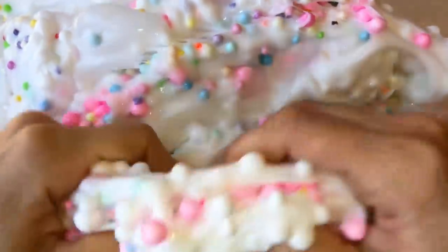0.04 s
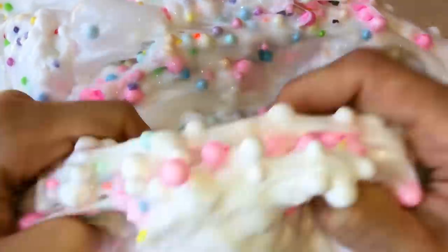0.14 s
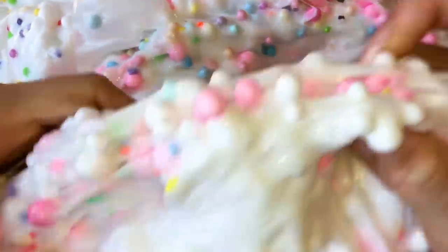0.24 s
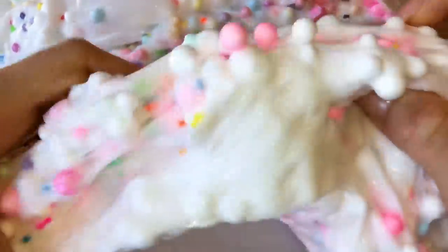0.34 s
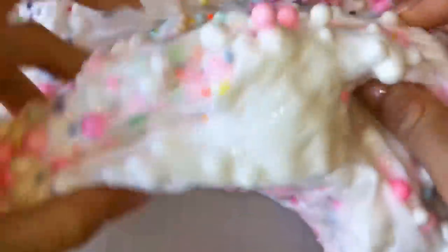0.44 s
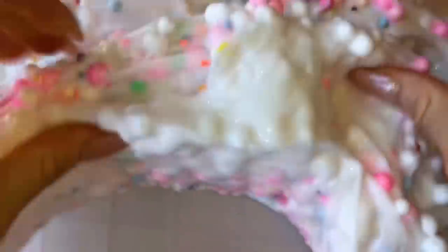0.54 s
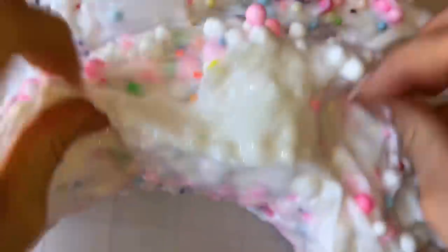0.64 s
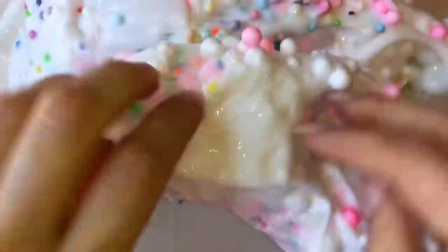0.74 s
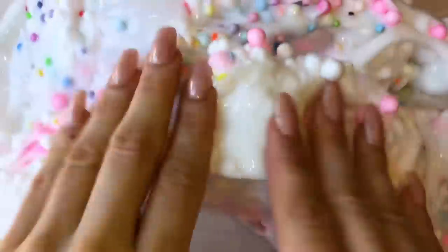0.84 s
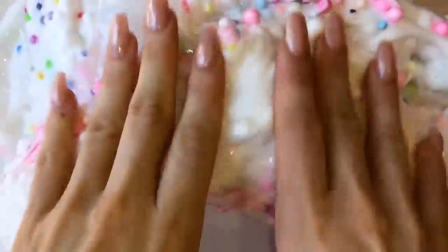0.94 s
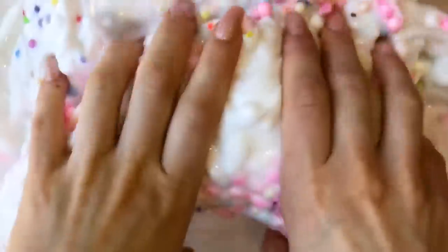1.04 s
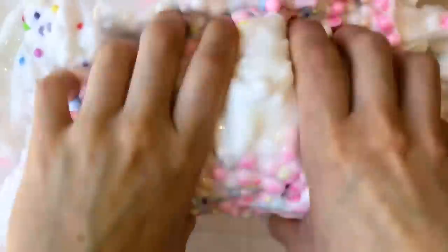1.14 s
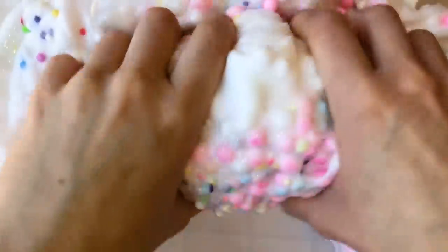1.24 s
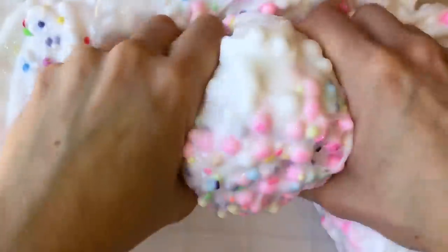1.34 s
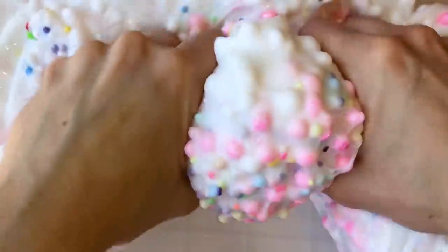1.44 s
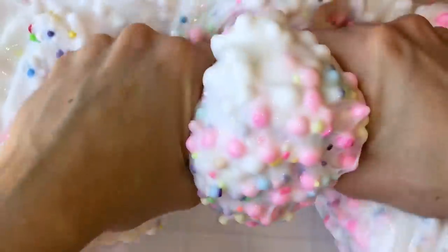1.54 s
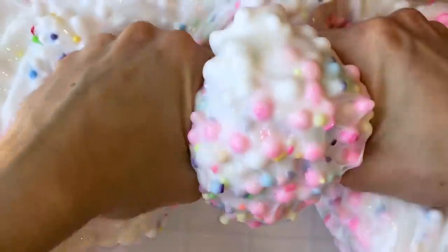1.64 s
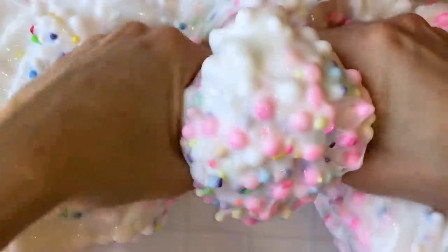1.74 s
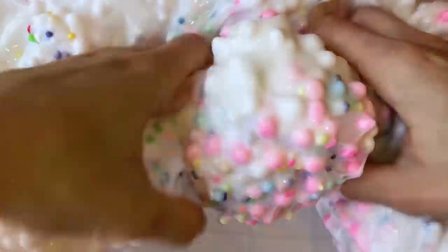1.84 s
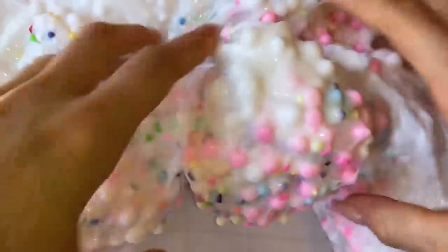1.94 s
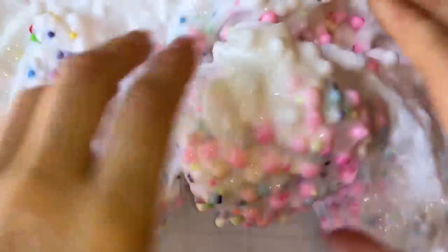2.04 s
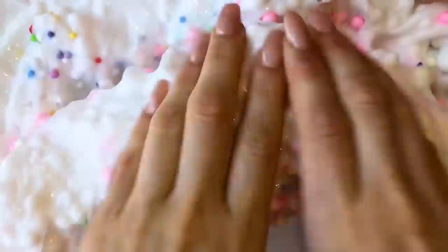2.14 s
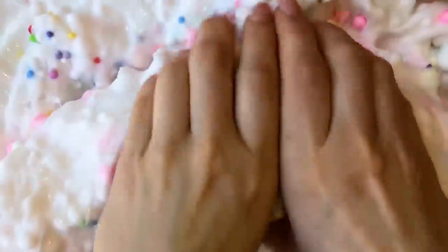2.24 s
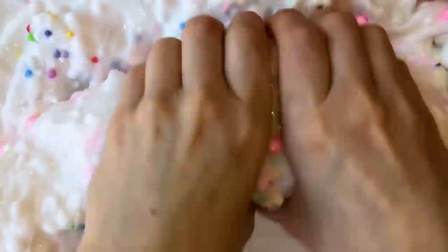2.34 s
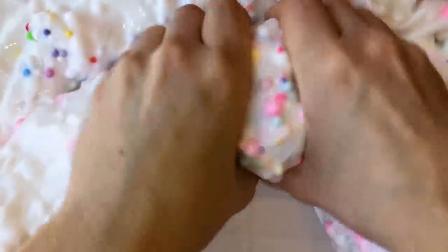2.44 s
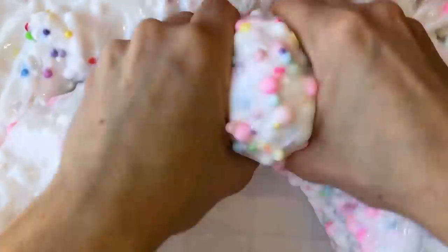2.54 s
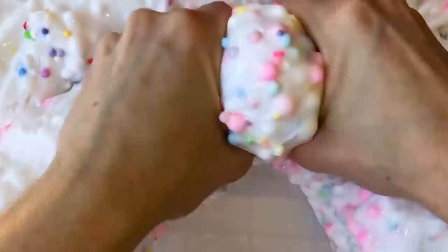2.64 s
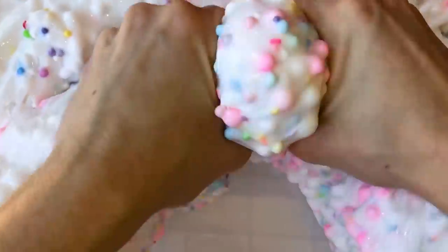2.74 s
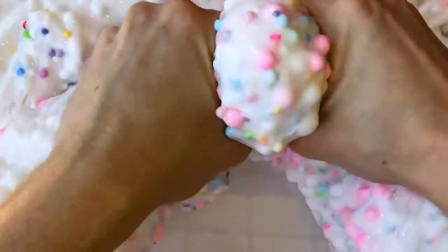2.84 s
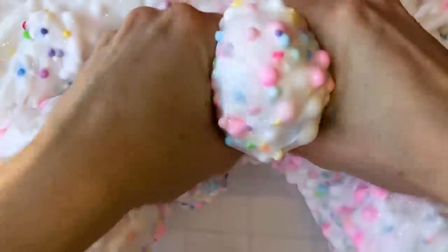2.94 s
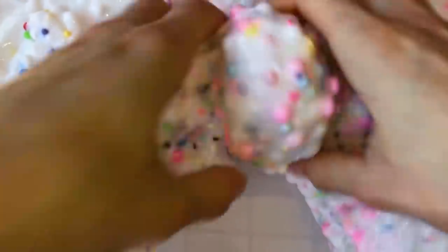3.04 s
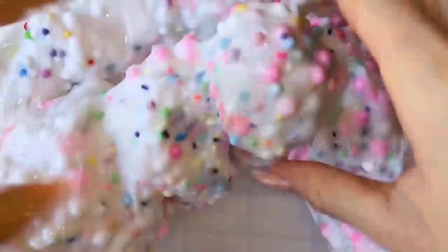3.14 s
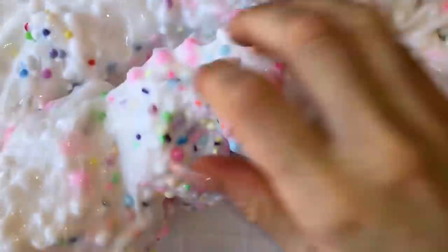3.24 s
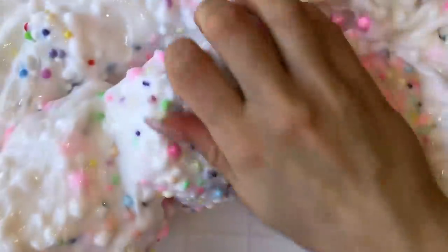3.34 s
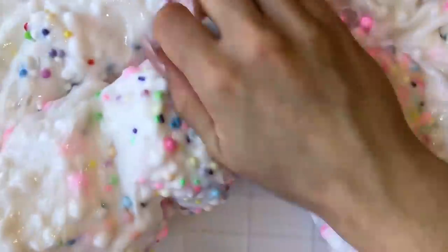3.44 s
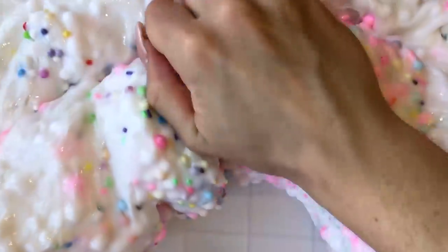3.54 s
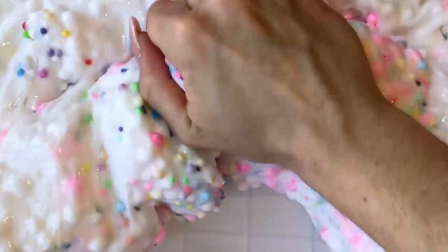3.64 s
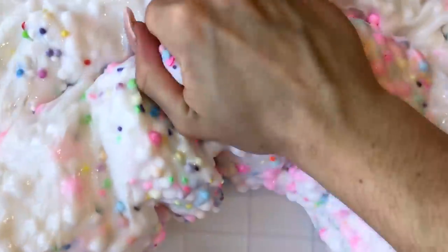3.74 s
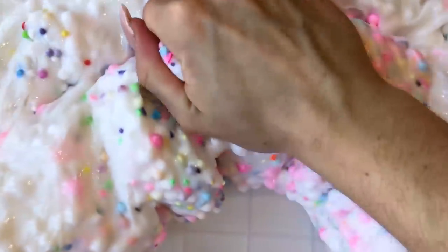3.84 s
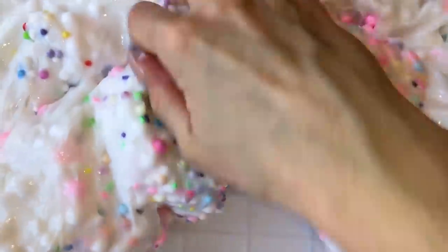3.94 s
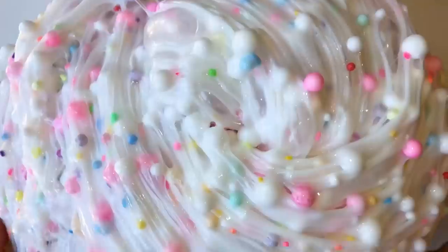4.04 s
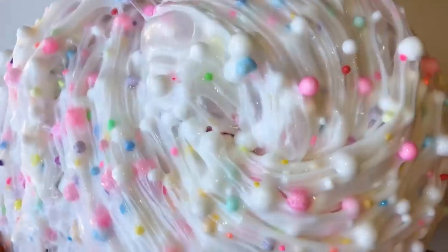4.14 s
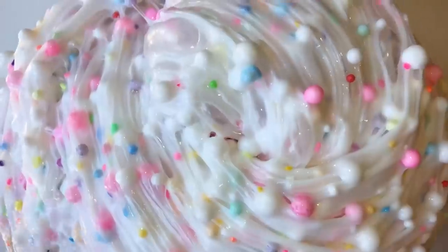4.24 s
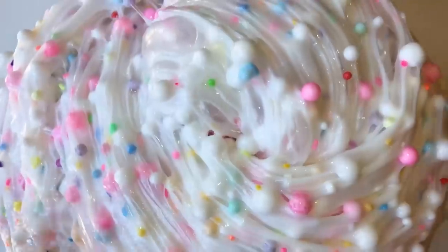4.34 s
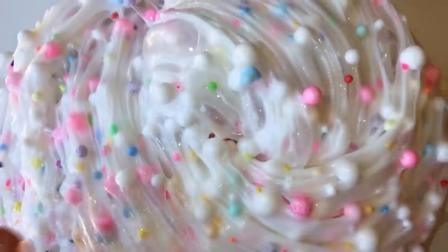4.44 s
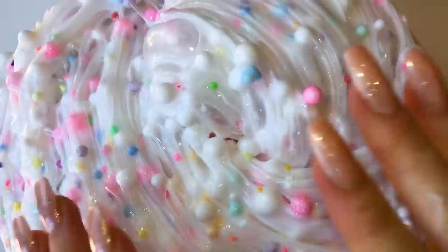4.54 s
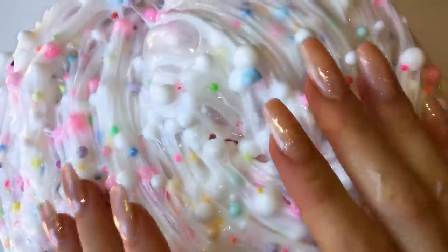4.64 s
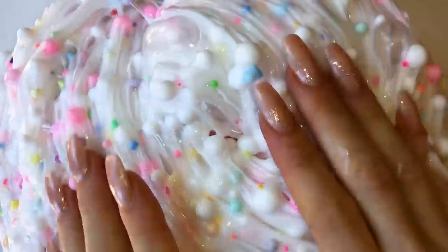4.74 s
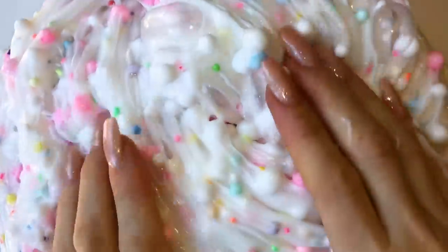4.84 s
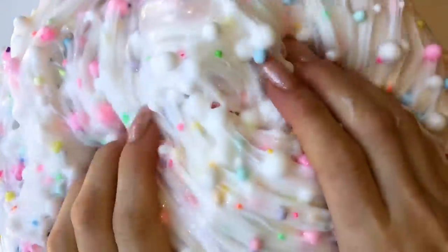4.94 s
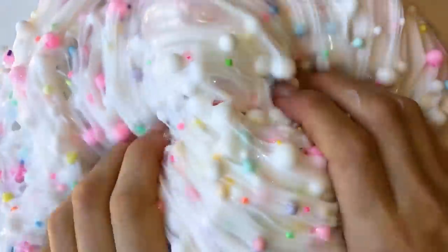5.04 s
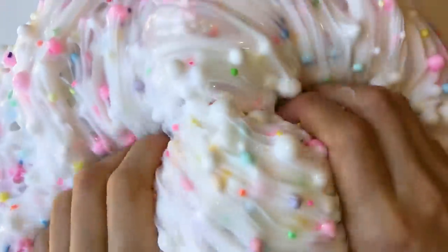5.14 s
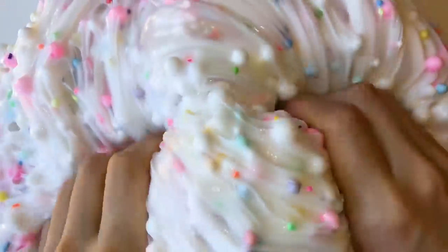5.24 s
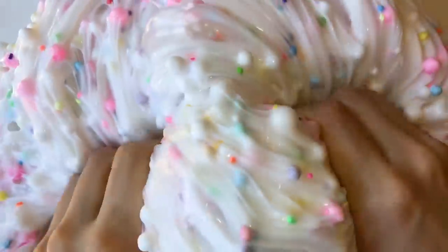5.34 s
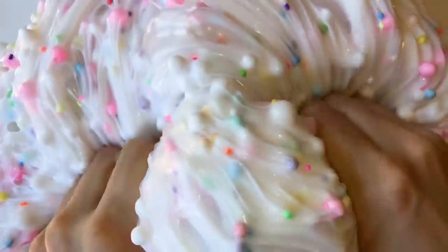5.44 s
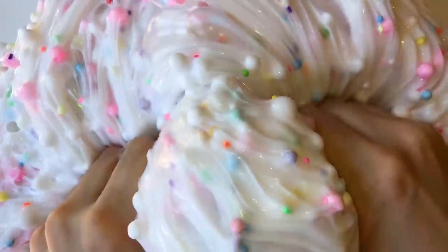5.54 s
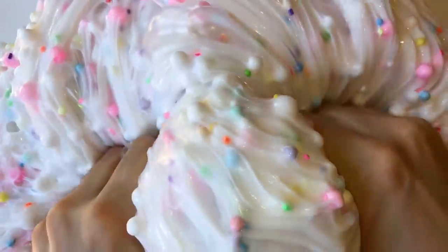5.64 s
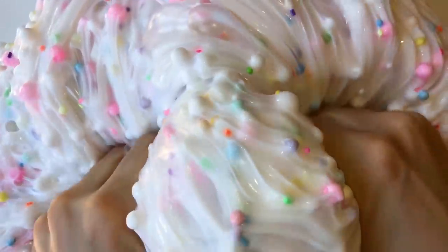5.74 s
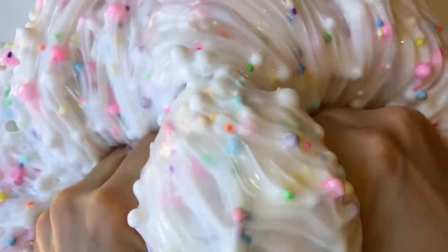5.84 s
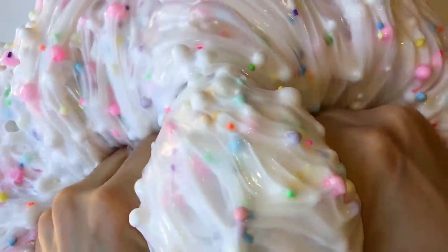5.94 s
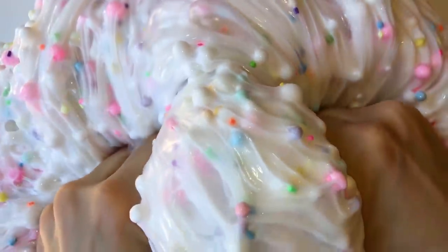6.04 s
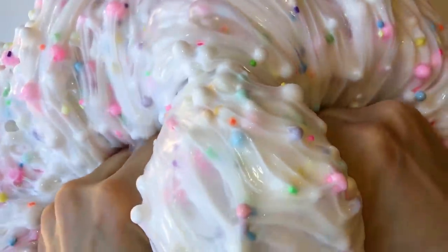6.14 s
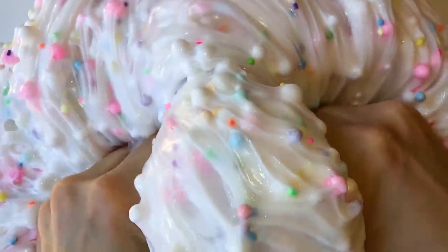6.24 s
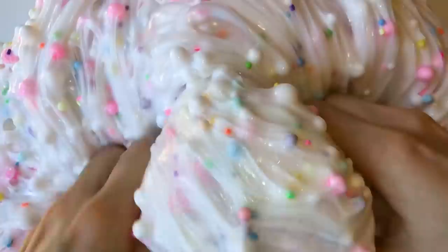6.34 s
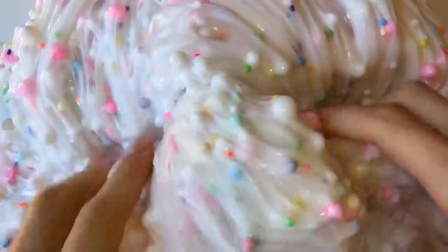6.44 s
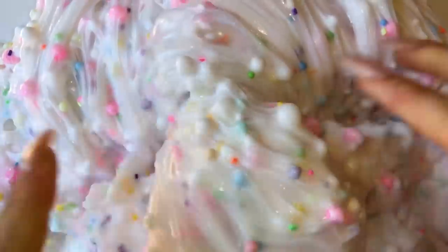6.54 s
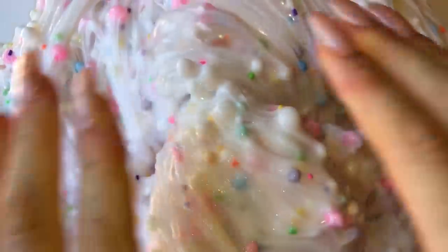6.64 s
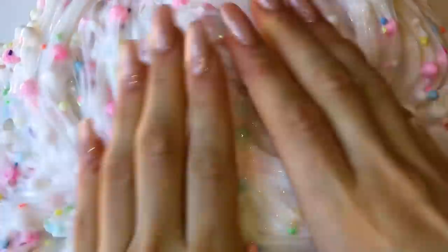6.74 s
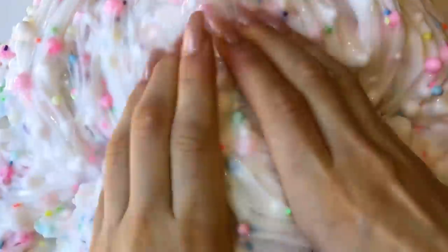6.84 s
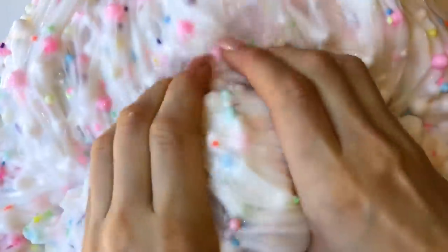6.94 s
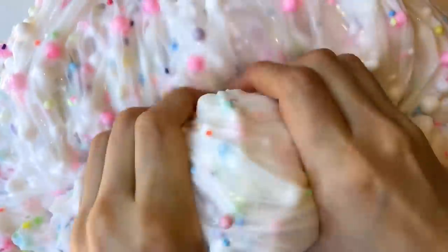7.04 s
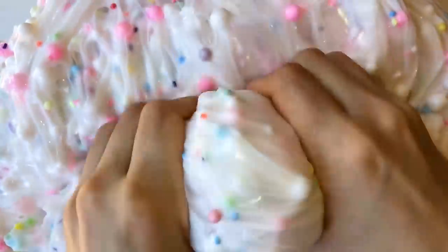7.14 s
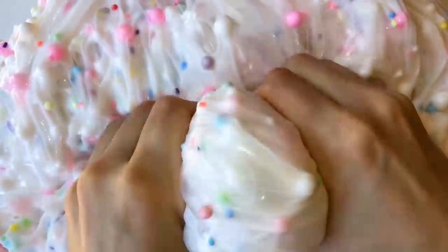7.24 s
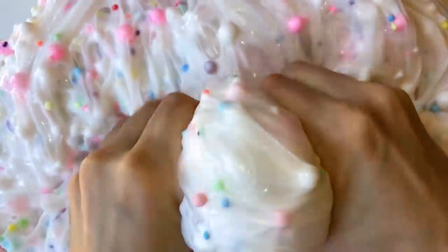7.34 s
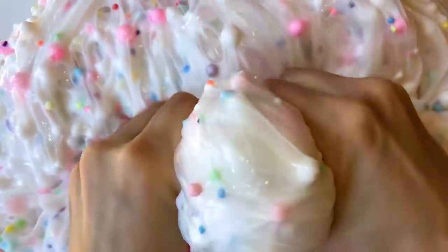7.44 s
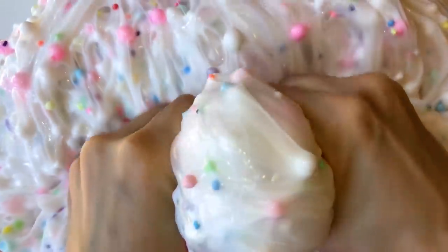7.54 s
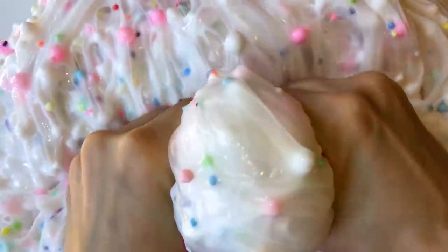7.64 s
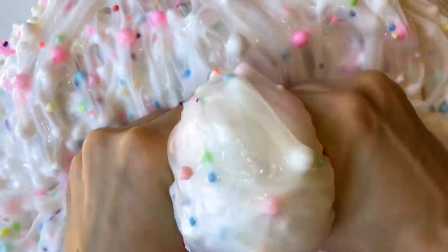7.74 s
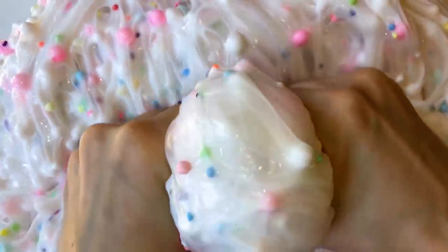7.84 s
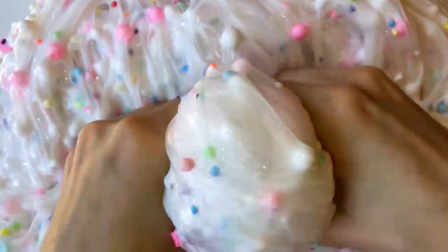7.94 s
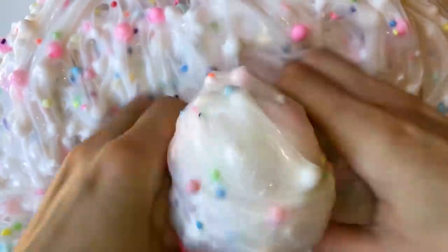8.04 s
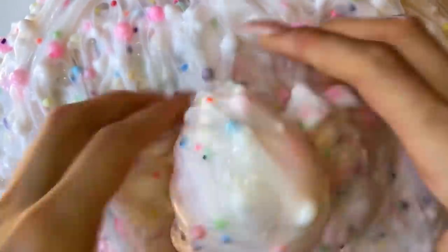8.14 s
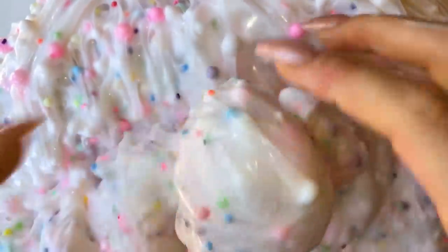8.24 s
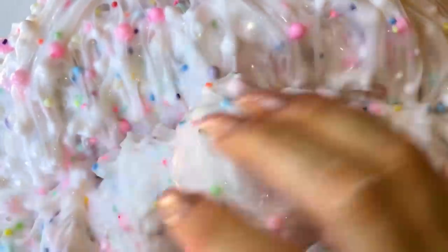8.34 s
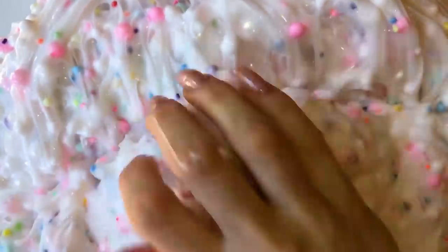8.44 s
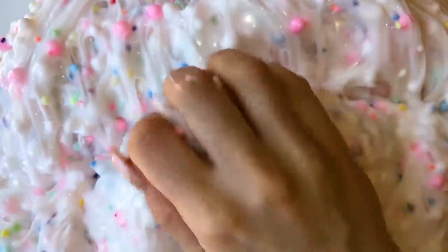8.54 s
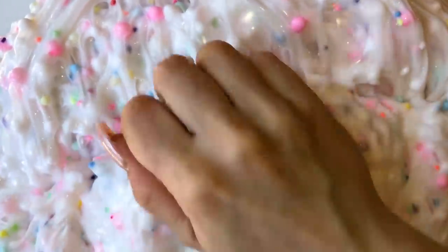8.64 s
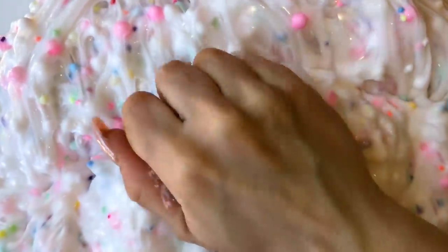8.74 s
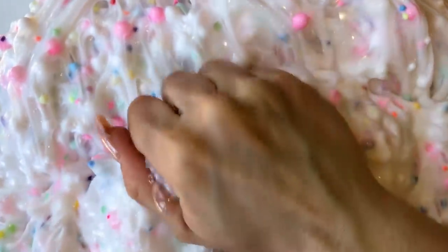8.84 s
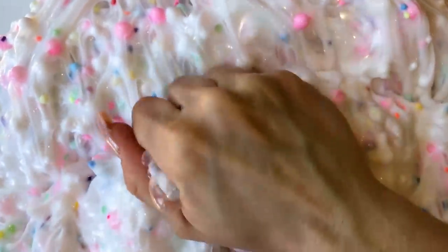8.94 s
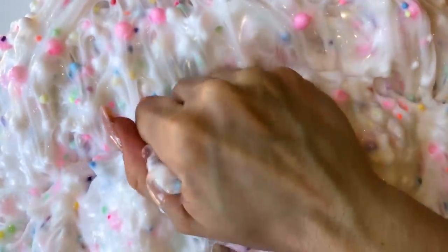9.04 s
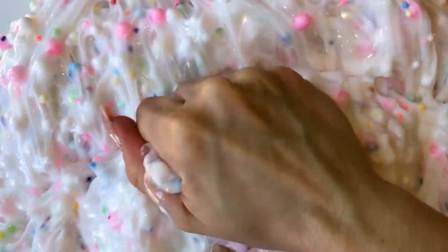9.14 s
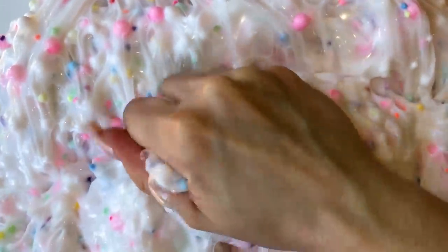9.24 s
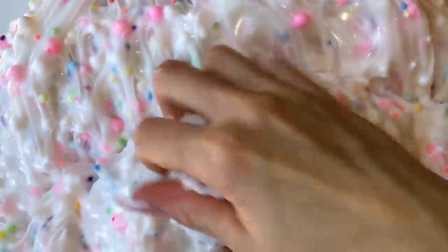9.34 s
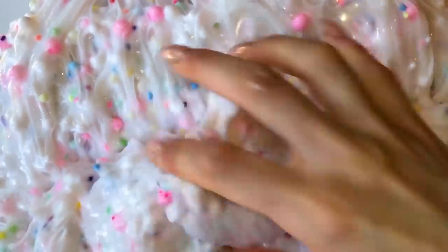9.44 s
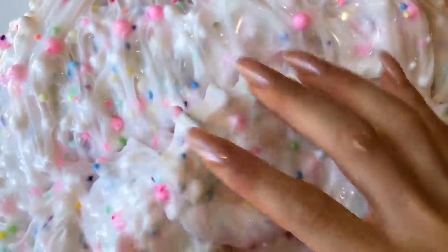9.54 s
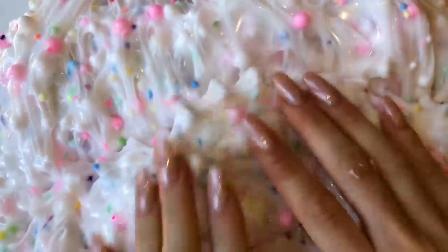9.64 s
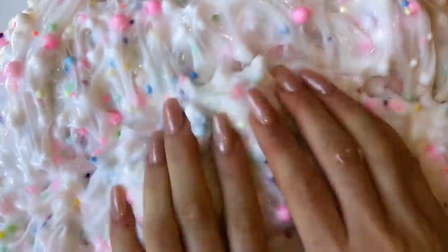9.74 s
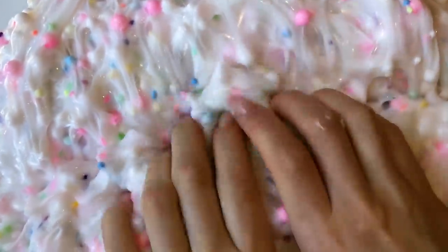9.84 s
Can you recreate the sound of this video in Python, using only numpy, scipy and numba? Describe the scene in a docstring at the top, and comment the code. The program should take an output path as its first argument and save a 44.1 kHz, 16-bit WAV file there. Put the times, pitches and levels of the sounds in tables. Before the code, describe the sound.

Close, wet squelching and crackling of bead-filled slime being squeezed and peeled by hand. At first the air pockets pop in scattered clusters, with one soft slap on the table and a few little hisses. The slime goes almost silent for a second, then three long squeezes set off rapid, crisp popping, one with a small gulp. The room is quiet apart from a faint rumble through the walls.

```python
"""Kneading bead-filled slime

Hands knead slime close under a phone. Trapped air pockets burst and ring as cavity resonators, giving
sharp pops; a few gulp, and some leak out as turbulent jets with a fading hiss. Sticky films rupture in
a fine crackle, wet pockets smack, and the slime slaps the table once. A low rumble swells in through
the walls of a quiet room."""
import sys
import numpy as np
from scipy import signal
from scipy.fft import rfft, irfft
from scipy.io import wavfile
from scipy.ndimage import uniform_filter1d
from numba import njit

SR = 44100
rng = np.random.default_rng(int(sys.argv[2]) if len(sys.argv) > 2 else 0)


def unload_wav(signal):
    """Save mono or channel-first audio to the path in sys.argv[1] as 16-bit WAV at rate SR, clipped to [-1, 1]."""
    wavfile.write(
        sys.argv[1],
        SR,
        np.round(np.clip(np.atleast_2d(signal).T, -1, 1) * 32767).astype(np.int16),
    )


N = 436149


def gain(db):
    """Amplitude ratio of a level in dB."""
    return 10 ** (np.asarray(db) / 20)


def unit_rms(x):
    """Normalisation to rms 1."""
    return x / np.sqrt(np.mean(x ** 2))


def unit_peak(x):
    """Normalisation to peak 1."""
    return x / np.abs(x).max()


def curves(table):
    """Linear interpolation of each level column over time, one value a sample."""
    times, *columns = np.transpose(table)
    return np.array([np.interp(np.arange(N) / SR, times, column) for column in columns])


def shaped_noise(spectrum):
    """Spectral shaping of white noise by (f, level) points, cut below the first; rms 1."""
    hz, db = np.transpose(spectrum)
    bin_hz = np.arange(1, N // 2 + 2) * SR / N
    bin_db = np.interp(np.log(bin_hz), np.log(hz), db, left=-99)
    return unit_rms(irfft(rfft(rng.standard_normal(N)) * gain(bin_db), N))


def resonate(x, hz, width_hz):
    """Second-order resonance with gain 1 at its centre."""
    return signal.lfilter(*signal.iirpeak(min(hz, .45 * SR), hz / width_hz, fs=SR), x)


def decay(count, t60):
    """Exponential decay over count samples, by 60 dB in t60 seconds."""
    return 1000. ** (-np.arange(count) / SR / t60)


def fluctuation(rate_hz):
    """Random modulation: Gaussian values joined by straight ramps, spread near 1."""
    hold = int(SR / rate_hz)
    steps = np.repeat(rng.standard_normal(N // hold + 1), hold)
    return uniform_filter1d(steps, hold)[:N]


def add(out, onset, x):
    """Superposition of x on out from an onset in seconds."""
    i = int(onset * SR)
    out[i:i + len(x)] += x[:N - i]


# Spectrum of the quiet room: f/Hz, relative level/dB
ROOM_SPECTRUM = [(700, -1.5), (1500, -10), (6500, -13.5), (16000, -30.5)]
def room_hiss(rms_db=-73):
    """Stationary broadband noise sets the noise floor of the room."""
    return gain(rms_db) * shaped_noise(ROOM_SPECTRUM)


# Swell of the rumble: t/s, level/dB
RUMBLE_LEVELS = [(0.0, -43.5), (0.34, -53.5), (0.87, -62), (1.15, -52), (1.65, -68), (2.1, -55.5),
                 (2.36, -67), (3.1, -64), (3.99, -68.5), (4.38, -58.5), (4.86, -60.5), (5.55, -51),
                 (6.85, -61), (7.46, -54.5), (9.89, -43.5)]
# Spectrum of the rumble: f/Hz, relative level/dB
RUMBLE_SPECTRUM = [(30, -20), (70, -7), (102, -3.5), (125, -8), (153, 0.5), (185, -9), (215, -6.5),
                   (485, -23), (615, -18.5), (750, -35.5), (1500, -35.5), (2200, -55.5), (4000, -80.5)]
def rumble():
    """Transmission through walls favours low frequencies: outside noise arrives as a wavering rumble."""
    noise = shaped_noise(RUMBLE_SPECTRUM)
    level_db = curves(RUMBLE_LEVELS)[0] + 2.5 * fluctuation(rate_hz=20)
    return noise * gain(level_db)


# Modes of the table: f/Hz, relative level/dB, T60/s
TABLE_MODES = [(118.8, 4.5, 0.11), (516, 9, 0.015), (205.3, 3, 0.047)]
# Impact of the slime on the table: t/s, level/dB
TABLE_SLAPS = [(.998, -23)]
def table_slap():
    """Free vibration: a soft impact leaves the table ringing as a sum of damped modes."""
    out, t = np.zeros(N), np.arange(SR // 4) / SR
    ring = sum(gain(db) * np.sin(2 * np.pi * hz * t) * decay(len(t), t60) for hz, db, t60 in TABLE_MODES)
    for onset, db in TABLE_SLAPS:
        add(out, onset, gain(db) * ring)
    return out


# Resonances of the slime lying on the table: f/Hz, bandwidth/Hz, level/dB
BODY_RESONANCES = [(360, 170, -2), (607, 54, -1), (1002, 386, 5)]
def slime_body(force):
    """Forced response: the slime and the table under it ring briefly in broad resonances."""
    return sum(gain(db) * resonate(force, hz, width) for hz, width, db in BODY_RESONANCES)


@njit
def ruptures(starts, hz, cycles, sizes):
    """Damped oscillation: each rupture is a soft-edged sine with a time constant given in cycles."""
    out = np.zeros(N)
    for k in range(len(starts)):
        phasor, pole = sizes[k] + 0j, np.exp(hz[k] / SR * (2j * np.pi - 1 / cycles))
        softening, damping = 1., np.exp(-hz[k] / SR / cycles)
        end = min(N, starts[k] + int(8 * cycles * SR / hz[k]))
        for i in range(starts[k], end):
            out[i] += phasor.imag * (1 - softening)
            phasor *= pole
            softening *= damping
    return out


def crackle(per_second, centres_hz, cycles, spread_db):
    """Shot noise: random ruptures, many small and a few large, each in three steps within 0.8 ms."""
    when, pitch, chance, *draws = rng.random((N // 40, 9))[:int(per_second * N / SR)].T
    lags, detunings = draws[:3], draws[3:]
    sizes = gain(spread_db * np.minimum(-np.log(1 - chance), 2.47))  # capped exponential law in dB
    low, high = centres_hz
    centre_hz = low * (high / low) ** pitch
    starts = np.concatenate([when * N + .0008 * SR * lag for lag in lags]).astype(np.int64)
    step_hz = np.concatenate([centre_hz * (0.71 + 0.8 * detuning) for detuning in detunings])
    return unit_rms(ruptures(starts, np.minimum(step_hz, .4 * SR), cycles, np.tile(sizes, 3)))


def swell(levels, rise_db_per_s=259, fall_db_per_s=179):
    """Amplitude envelopes: exponential rise, the given levels, exponential fall."""
    t = np.arange(N) / SR
    before = np.maximum(levels[0][0] - t, 0)
    after = np.maximum(t - levels[-1][0], 0)
    return gain(curves(levels) - rise_db_per_s * before - fall_db_per_s * after)


# Slime peeling off skin or table: t/s, duration/s, film level/dB, squelch level/dB
PEEL_STROKES = [(0.54, 0.12, -46.5, -38.5), (1.949, .12, -34.5, -40.5), (3.111, 0.078, -34.5, -37),
                (3.778, 0.042, -41.5, -36.5), (4.05, 0.014, -38.5, -48), (4.106, 0.045, -57, -63.5),
                (4.275, 0.038, -50, -56.5), (6.468, .13, -32.5, -38), (8.103, 0.18, -39.5, -42.5),
                (9.433, 0.066, -40, -43), (9.532, 0.052, -50.5, -53.5)]
def peel_envelopes(sag_db_per_s=38, tail_db=-8):
    """Exponential decay in stages: a short peeling crackle sags, stops abruptly, leaves a faint tail."""
    envelopes = np.zeros((2, N))
    for onset, duration, *start_db in PEEL_STROKES:
        end_db = np.array(start_db) - sag_db_per_s * duration
        levels = [(onset, *start_db), (onset + duration, *end_db)]
        envelopes += swell(levels, fall_db_per_s=688) + gain(tail_db) * swell(levels)
    return envelopes


# Spectrum of tearing films: f/Hz, relative level/dB
FILM_SPECTRUM = [(1500, 0), (4500, -1.5), (15000, -12.5)]
# Crackle curves (hand squeezes, and a brief rise at the very end): t/s, film level/dB, squelch level/dB
CRACKLE_CURVES = [
    [(0, -26.5, -21), (.12, -35.5, -32), (.26, -42.5, -45), (.44, -51.5, -51), (.71, -58.5, -58),
     (.94, -55, -57)],
    [(1.02, -48, -50), (1.21, -44, -43.5), (1.44, -37.5, -47), (1.51, -47, -46), (1.64, -37, -49.5),
     (1.86, -60, -68)],
    [(2.38, -39.5, -45), (2.62, -43.5, -47), (2.67, -35.5, -41), (2.84, -46.5, -44.5), (3.03, -61, -82)],
    [(3.5, -61, -66), (3.58, -49, -49), (3.73, -57, -75)],
    [(4.91, -47, -51), (5.17, -39, -46), (5.51, -27, -37.5), (5.71, -39, -49.5), (5.78, -35.5, -60),
     (5.94, -41.5, -52.5), (6.13, -49, -68), (6.33, -62.5, -90)],
    [(6.99, -33, -41.5), (7.07, -39, -48), (7.18, -31, -36), (7.45, -33.5, -37.5), (7.55, -32, -40.5),
     (7.8, -39.5, -43), (7.9, -37.5, -40)],
    [(8.57, -51.5, -54), (8.69, -39, -45), (8.74, -33, -32.5), (8.84, -28, -31.5), (9.02, -28.5, -39.5),
     (9.21, -31.5, -48), (9.36, -46, -56)],
    [(9.84, -47.5, -53), (9.89, -38, -47)],
]
def kneading():
    """Rupture under strain: films tear in ticks over a gusty fizz; wet pockets smack lower down."""
    film, wet = sum(swell(levels) for levels in CRACKLE_CURVES)
    peel_film, peel_wet = peel_envelopes()
    gusts = fluctuation(rate_hz=120)
    fizz = shaped_noise(FILM_SPECTRUM) * gain(3.4 * gusts)
    ticks = crackle(per_second=160, centres_hz=(2260, 15200), cycles=0.61, spread_db=7.5)
    smacks = crackle(per_second=150, centres_hz=(520, 2520), cycles=0.7, spread_db=3.5)
    rub = unit_rms(slime_body(rng.standard_normal(N))) * gain(4.7 * gusts)
    # pressure bursts small pockets one by one; peeling is a softer, even tear
    return (film * (gain(-11) * fizz + gain(-3) * ticks)
            + wet * (gain(-7) * smacks + gain(-10) * rub)
            + peel_film * (gain(-9) * fizz + gain(-10) * ticks)
            + peel_wet * (gain(-9) * smacks + gain(-8.5) * rub))


# Air escaping from opened pockets: t/s, level/dB, f/Hz, resonator bandwidth/Hz, T60/s
AIR_JETS = [(1.675, -29.5, 4670, 3600, 0.4), (2.664, -38, 3570, 1400, 0.82), (2.812, -43, 1230, 700, 0.52),
            (2.915, -32, 6160, 5850, 0.4), (3.76, -28.5, 1780, 1320, 0.51),
            (3.758, -31.5, 6140, 2610, 0.37), (3.76, -38, 11800, 3000, 0.26),
            (1.678, -41.5, 9980, 4960, 0.35), (9.223, -33.5, 7630, 5030, 0.37)]
def leaks(attack_s=0.002):
    """Turbulent jet noise: a band of hiss sets in fast and dies as the pocket empties."""
    out, t = np.zeros(N), np.arange(SR // 2) / SR
    for onset, db, hz, width, t60 in AIR_JETS:
        air = rng.standard_normal(len(t))
        band = resonate(resonate(air, hz, width), hz, width)
        jet = unit_rms(band) + gain(-28) * air
        envelope = (1 - np.exp(-t / attack_s)) * decay(len(t), t60) * np.cos(np.pi * t)
        add(out, onset, gain(db) * jet * envelope)
    return out


# Large wet bubbles: t/s, peak level/dB, final f/Hz, T60/s
WET_BUBBLES = [(1.199, -21, 1580, 0.014), (2.808, -20.5, 1020, 0.03), (7.482, -14, 634, 0.041)]
def gulps(start_ratio=1.92, glide_s=0.0021, attack_s=0.0018):
    """Cavity resonance: a bubble's note sinks as its mouth closes."""
    out, t = np.zeros(N), np.arange(3600) / SR
    for onset, db, final_hz, t60 in WET_BUBBLES:
        hz = final_hz * (1 + (start_ratio - 1) * np.exp(-t / glide_s))
        envelope = (1 - np.exp(-t / attack_s)) * decay(len(t), t60)
        note = np.sin(2 * np.pi * np.cumsum(hz) / SR) * envelope
        add(out, onset, gain(db) * unit_peak(note))
    return out


# Bursting air pockets: t/s, cavity peak level/dB, cavity f/Hz, thud level/dB re cavity peak
AIR_POCKETS = [(.0036, 3, 4960, -29.5), (0.0365, -2.5, 6030, -28.5), (0.1788, -19, 1290, -2),
               (0.2325, -15.5, 3860, -29), (0.6322, -17.5, 714, -32.5), (.6524, -13.5, 9500, -15),
               (.7388, -25, 4010, -26), (1.022, -19.5, 4900, -28), (1.094, -23.5, 6000, -32),
               (1.126, -23, 11000, -35), (1.17, -19, 10600, -31), (1.2, -13.5, 1700, -3),
               (1.2121, -16.5, 11300, -27), (1.345, -31, 6000, -25), (1.363, -22, 2490, -6),
               (1.45, -21.5, 2000, -2), (1.4794, -17, 8800, -18), (1.5182, -21, 2000, -16),
               (1.572, -16, 5500, -36.5), (1.592, -0.5, 5400, -17), (1.6596, 0.5, 4680, -29),
               (1.6734, -12.5, 2490, -12), (1.978, -11, 6960, -6), (2.051, -16.5, 1430, -9),
               (2.446, -8, 4950, -18), (2.5193, -15.5, 9000, -36), (2.5569, -16, 7960, -36),
               (2.634, -17, 10500, -41), (2.658, 0.5, 3200, -16), (2.7527, -11.5, 814, -18),
               (2.8097, -9, 1285, -25.5), (2.8863, -4, 6600, -40), (2.9057, -3.5, 6600, -38),
               (3.152, -16, 2500, -1.5), (3.4693, -28.5, 4760, -14), (3.5598, -23, 8700, -31),
               (3.574, -21, 8900, -13), (3.6952, -15.5, 3170, -43.5), (3.7093, -18, 6900, -43),
               (3.747, -1, 2000, -12), (3.7469, -4, 6300, -42), (3.828, -16.5, 7760, -25),
               (4.159, -31, 8900, -35.5), (4.808, -41.5, 5940, -30), (4.909, -28.5, 1220, 1.5),
               (4.9247, -21, 6000, -34), (5.017, -15.5, 2930, -8.5), (5.1506, -18, 3540, -20),
               (5.1552, -17, 3130, -15), (5.1703, -15, 2680, -36), (5.204, -14.5, 9300, -34),
               (5.2694, -16.5, 5670, -11.5), (5.3059, -20, 7260, -5), (5.344, -20, 3750, -36),
               (5.361, -3, 11000, -32), (5.3697, -2.5, 4740, -28), (5.404, -14, 2350, -3.5),
               (5.4261, 3.5, 2880, -11), (5.496, -4.5, 1480, -4), (5.5014, -14, 1020, -3.5),
               (5.5046, -0.5, 6800, -16), (5.5241, -2, 6700, -43), (5.5721, -1.5, 7140, -36.5),
               (5.5861, 1.5, 3600, -24), (5.6222, -5, 1490, -14), (5.6348, -4, 4840, -9.5),
               (5.717, -15.5, 5050, -22), (5.7433, -13, 5000, -12), (5.7653, -1, 2580, -23),
               (5.822, -22, 8680, -24), (5.845, -22.5, 5300, -27.5), (5.872, -6, 7000, -20.5),
               (5.9286, -5, 2340, -23), (5.9875, -13.5, 5340, -6.5), (6.01, -17.5, 3520, -35),
               (6.12, -14, 4700, -43), (6.201, -23, 4430, -16), (6.2649, -29, 3760, -11),
               (6.2947, -19.5, 5050, -20), (6.463, -16, 4400, -21), (6.523, -14.5, 2290, -12),
               (6.9813, -21, 5700, -1), (7.01, -9, 5650, -19), (7.0888, -20, 4010, -10),
               (7.167, -15.5, 1970, -30), (7.1832, -5, 2330, -8), (7.1942, -5, 5730, -31),
               (7.2392, 0, 4840, -18.5), (7.2972, -2, 1050, -38), (7.369, -9.5, 7400, -11),
               (7.399, -10, 1340, -34), (7.4495, -25, 4900, -23.5), (7.4805, -6.5, 3890, -15),
               (7.519, -23, 6700, -16), (7.5455, 0.5, 4760, -24), (7.5635, -5, 3860, -10.5),
               (7.567, -17.5, 790, -14), (7.5967, 1, 6130, -18), (7.607, -2, 8350, -16),
               (7.6744, -8.5, 7700, -24), (7.677, -9.5, 725, -31), (7.6852, -3.5, 5730, -9),
               (7.7111, -9.5, 8300, -8), (7.81, -13.5, 5170, -8), (7.8814, -13.5, 970, -3.5),
               (7.892, -9.5, 1480, -34), (7.9288, -16.5, 1260, -33), (8.231, -20.5, 1200, -11),
               (8.418, -41, 6900, -29), (8.7172, -2.5, 4600, -17), (8.7199, -3.5, 4500, -39.5),
               (8.7378, -1, 1080, -5), (8.8238, -4, 740, -19), (8.8275, -10.5, 1030, 7),
               (8.8417, -6.5, 5430, -22), (8.859, 0, 10370, -34), (8.8785, -17, 1970, -28.5),
               (8.8906, -6, 2410, -3.5), (8.9089, 3.5, 4000, -14), (8.9161, -0.5, 3840, -17),
               (8.9416, 2.2, 2570, -10), (8.9635, -4, 11000, -21), (8.9698, -1, 7700, -21),
               (9.033, -0.5, 8000, -44), (9.051, -0.5, 6050, -15.5), (9.064, -3, 9770, -41),
               (9.0714, -5.5, 10370, -30.5), (9.076, -3, 9210, -43), (9.0885, 0, 9770, -34.5),
               (9.101, -5, 7700, -22), (9.1047, -1.5, 5200, -21), (9.1193, -1, 7700, -22),
               (9.1314, -20, 1030, 6), (9.141, 2.5, 9800, -25), (9.1812, -20, 2490, -5),
               (9.2167, 0, 10300, -35), (9.246, -3, 8500, -34), (9.2706, -9.5, 1530, -30),
               (9.4626, -13.5, 9600, -14.5), (9.768, -31.5, 8950, -35), (9.8527, -2.5, 6600, -14.5)]
def pops(snap_db=-12.5, flutter_db=-21.5, samples=1800):
    """Impulse excitation: a burst and its air rush ring the cavity; the film snaps, the slime thuds."""
    out, highpass = np.zeros(N), signal.butter(2, 6000, "high", fs=SR, output="sos")
    for onset, db, hz, thud_db in AIR_POCKETS:
        air = rng.standard_normal((4, samples))
        rush = air[:3] * decay(samples, t60=0.0026 + 3.5 / hz)  # large pockets empty more slowly
        rush[:, 0] = 2.95  # the wall gives way at once
        cavity = unit_peak(resonate(rush[0], hz, 0.51 * hz))
        snap = gain(snap_db) * unit_peak(signal.sosfilt(highpass, rush[1]))
        thud = gain(thud_db) * unit_peak(slime_body(rush[2]))
        # the torn edges flutter and near surfaces answer for a few milliseconds
        flutter = gain(flutter_db) * unit_rms(resonate(air[3], hz, 1.1 * hz)) * decay(samples, t60=0.03)
        add(out, onset, gain(db) * (cavity + snap + thud + flutter))
    return out


def scene():
    """Linear superposition of all sources at one microphone."""
    return (pops() + gulps() + leaks() + table_slap() + kneading() + rumble() + room_hiss())[None]


def record(dry, cutoff_hz=16400):
    """Group delay and band limiting: the phone delays the lows, cuts bass and top, and rounds peaks."""
    pole = np.exp(2 * np.pi * (-300 + 500j) / SR)  # all-pass section, greatest delay near 500 Hz
    a = np.poly([pole, pole.conjugate()]).real
    b = a[::-1]
    delayed = signal.lfilter(b, a, signal.lfilter(b, a, dry))
    band = signal.sosfilt(signal.butter(2, [70, 16000], "band", fs=SR, output="sos"), delayed)
    rounded = np.tanh(1.1 * band) / 1.1
    return signal.sosfilt(signal.ellip(10, .2, 70, cutoff_hz, fs=SR, output="sos"), rounded)


dry = scene()
out = record(dry)
unload_wav(out)
```